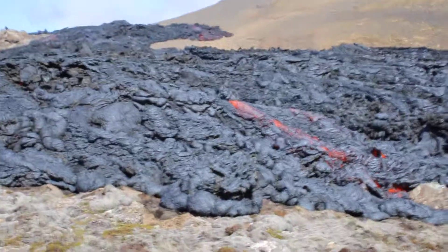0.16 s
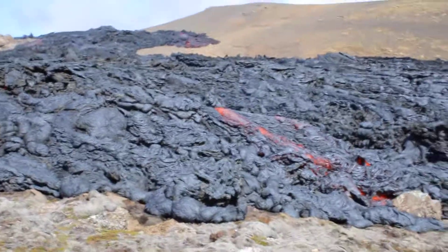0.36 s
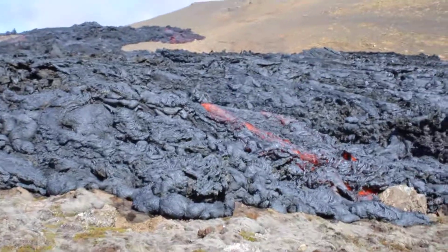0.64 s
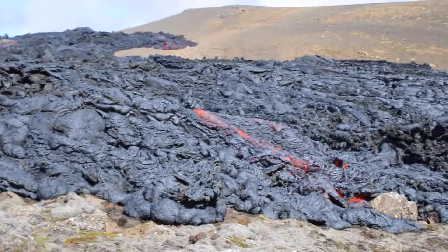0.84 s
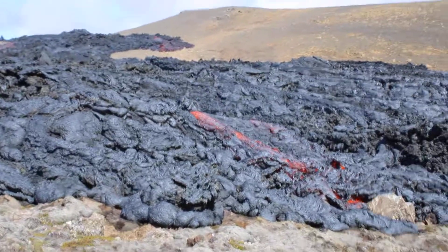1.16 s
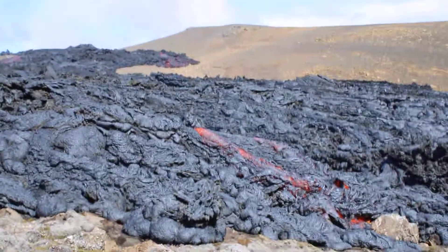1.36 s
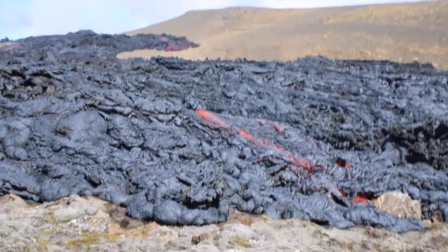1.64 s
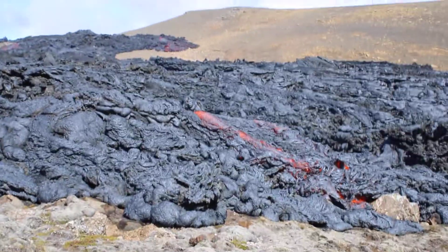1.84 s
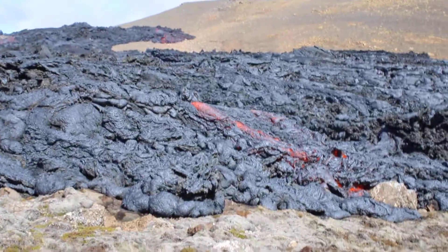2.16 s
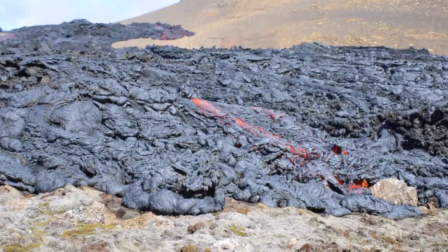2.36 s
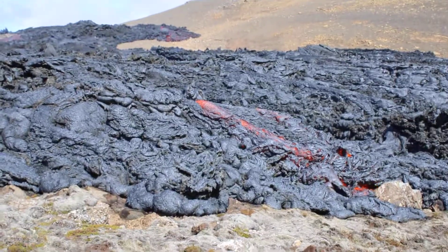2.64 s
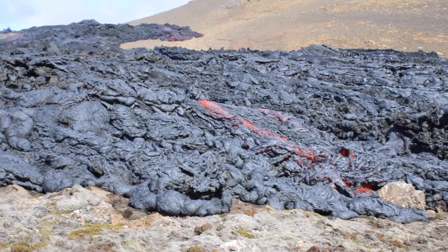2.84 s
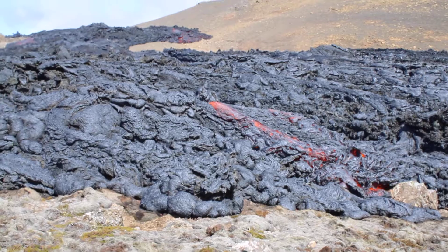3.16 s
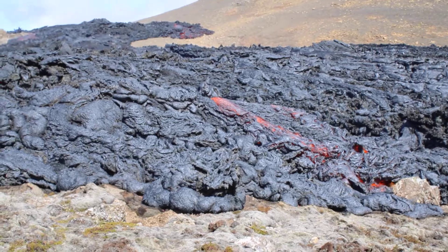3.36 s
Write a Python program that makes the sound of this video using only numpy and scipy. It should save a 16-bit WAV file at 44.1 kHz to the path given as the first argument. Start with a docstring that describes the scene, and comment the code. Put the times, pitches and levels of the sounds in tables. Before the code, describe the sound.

Gusty wind rumbles on a bare microphone beside a lava flow. The rumble swells and sinks throughout, broken by irregular sharp snaps, dull thumps and crackle, with very faint ticks from the cooling rock underneath.

```python
"""Gusty wind on an open slope beside a creeping lava flow, heard through a bare microphone.
From the start, turbulence makes a low rumble with faint hiss and crackle, and the cooling crust ticks.
Almost at once, eddies break on the microphone as sharp snaps and dull thumps, and it briefly chokes.
The hardest snap, after one second, overloads it; four clearer fractures follow in the crust.
The rumble swells and sinks, and the eddies keep coming to the end."""
import sys
import numpy as np
from scipy import signal
from scipy.fft import rfft, irfft
from scipy.io import wavfile

SR = 44100
rng = np.random.default_rng(int(sys.argv[2]) if len(sys.argv) > 2 else 0)


def output_pcm(signal):
    """Save a mono or channel-first signal as 16-bit PCM at the path in sys.argv[1].

    Samples are clipped to [-1, 1] before scaling.
    """
    pcm = np.clip(np.atleast_2d(signal).T, -1, 1) * 32767
    wavfile.write(sys.argv[1], SR, np.round(pcm).astype(np.int16))


N = 154791
TIME = np.arange(N) / SR


def from_db(db):
    """Amplitude ratio of a level in decibels."""
    return 10 ** (np.asarray(db) / 20)

def unit_rms(x):
    """Normalisation to an rms of 1."""
    return x / np.sqrt(np.mean(x ** 2) + 1e-20)

def butter(x, hz, kind, order=2):
    """Butterworth filter."""
    return signal.sosfilt(signal.butter(order, hz, kind, fs=SR, output="sos"), x + 1e-18)

def gains(spectrum, hz):
    """Interpolation of a spectrum on a log-frequency axis."""
    points, db = np.transpose(spectrum)
    return from_db(np.interp(np.log(np.maximum(hz, 1)), np.log(points), db))

def noise(bin_gains, size):
    """Spectral shaping: white noise weighted bin by bin."""
    return irfft(rfft(rng.standard_normal(size)) * bin_gains, size)

def coloured(spectrum):
    """Stationary noise with the given spectrum and an rms of 1."""
    return unit_rms(noise(gains(spectrum, np.fft.rfftfreq(N, 1 / SR)), N))

def flutter(hz):
    """Random modulation: low-passed noise with rounded extremes and a spread of about 1."""
    swing = unit_rms(butter(rng.standard_normal(N + SR), hz, "low")[SR:])
    return 2 * np.tanh(swing / 2)


# Strength of the wind: (time [s], relative level [dB])
WIND_STRENGTH = [(0.01, -18), (0.06, -28), (0.549, -33.5), (0.58, -23.5), (1.219, -26), (1.239, -34),
                 (1.34, -30), (1.442, -20), (1.572, -35.5), (1.95, -22.5), (2.122, -26), (2.209, -21),
                 (2.249, -26), (2.3, -23.5), (2.35, -37), (2.52, -27), (3.14, -34.5), (3.49, -24.5)]
def wind():
    """Gusting: an amplitude envelope that swells and sinks linearly in decibels."""
    return from_db(np.interp(TIME, *np.transpose(WIND_STRENGTH)))


# Spectrum of the turbulent pressure: (frequency [Hz], relative density [dB])
RUMBLE_SPECTRUM = [(20, -15), (38, -2), (70, 0.5), (140, 0), (280, -7.5), (560, -19), (1100, -36.5),
                   (2000, -56.5), (4000, -83.5)]
def rumble(strength, gain_db=3.5, flutter_db=5):
    """Turbulent pressure fluctuation: lumpy low noise whose amplitude follows the wind."""
    lumps = from_db(flutter_db * flutter(hz=29))
    return from_db(gain_db) * strength * unit_rms(coloured(RUMBLE_SPECTRUM) * lumps)


# Spectrum of the wind's hiss: (frequency [Hz], relative density [dB])
HISS_SPECTRUM = [(300, 5.5), (1500, -2.5), (3000, -2), (5000, -8.5), (7800, -9.5), (9500, -27.5),
                 (15000, -48)]
def hiss(strength, level_db=-67, exponent=0.4):
    """Broadband flow noise: its amplitude grows as a weak power of the wind's strength."""
    return from_db(level_db) * unit_rms(strength ** exponent * coloured(HISS_SPECTRUM))


RELEASE_HZ = 348   # high-pass corner that makes pops and snaps swing back
def crackle(strength, pops_per_s=150, gain_db=-20, spread_db=8.5, corner_hz=960):
    """Shot noise: tiny dull pops at random instants, louder in stronger wind."""
    onsets = rng.random(N) < pops_per_s / SR
    sizes = from_db(spread_db * np.minimum(rng.exponential(1, N), 2))
    impulses = onsets * sizes * rng.choice([-1, 1], N)
    pops = butter(butter(impulses, corner_hz, "low"), 2 * corner_hz, "low")
    pops *= SR / (2 * corner_hz)   # makes up the height lost in smoothing
    return from_db(gain_db) * strength * butter(pops, RELEASE_HZ, "high", order=1)


# Spectrum of an eddy before its corner dulls it: (frequency [Hz], relative density [dB])
EDDY_SPECTRUM = [(30, -17), (90, -4), (190, 4), (330, 1), (600, -3), (1200, -2), (2500, -3.5), (4500, -8),
                 (8000, -8), (10500, -32), (15000, -23.5)]
# Eddies at the microphone: (centre time [s], swell and fade scale [s], relative level [dB], corner [Hz])
EDDY_PUFFS = [(0.0169, 0.014, -21.5, 1780), (0.027, 0.0015, -14, 1710), (0.0519, 0.0075, -22.5, 1310),
              (0.0767, 0.0044, -16.5, 1200), (0.1112, 0.0008, -10.5, 3950), (0.1157, 0.0019, -8.5, 1600),
              (0.1754, 0.0018, -17.5, 4530), (0.2505, 0.00047, -26, 1930), (0.281, 0.006, -12.5, 540),
              (0.305, 0.0054, -17, 2380), (0.324, 0.0066, -20.5, 1670), (0.3674, 0.006, -18.5, 2350),
              (0.395, 0.0037, -20.5, 2320), (0.471, 0.0006, -17.5, 1670), (0.5281, 0.00063, -23.5, 1920),
              (0.5528, 0.0019, -15.5, 990), (0.5765, 0.0049, -14.5, 1440), (0.6036, 0.0036, -16.5, 1600),
              (0.6291, 0.0017, -20.5, 1750), (0.666, 0.003, -13, 1710), (0.6741, 0.0025, -10.5, 2100),
              (0.7398, 0.0013, -13, 810.0), (0.7563, 0.00077, -19.5, 1870.0), (0.805, 0.00058, -11, 2700),
              (0.8195, 0.0028, -15, 800), (0.862, 0.0012, -18, 940), (0.8779, 0.0012, -13.5, 1350),
              (0.8950, 0.00074, -14.5, 1850), (0.9401, 0.00033, -3.5, 1300), (0.947, 0.0016, -14.5, 1920),
              (0.9560, 0.0027, -12.5, 1900), (0.967, 0.0045, -15.5, 960), (1.005, 0.0022, -23.5, 1050),
              (1.0617, 0.0089, -8, 770), (1.098, 0.016, -17, 1300.0), (1.117, 0.00074, -12.5, 1640),
              (1.132, 0.0068, -22, 1063), (1.1422, 0.0014, -10.5, 1000), (1.1742, 0.0042, -13, 1250),
              (1.236, 0.00098, -14, 690), (1.2512, 0.006, -2, 600), (1.2937, 0.0081, -6.5, 580),
              (1.2966, 0.012, -27, 2400.0), (1.328, 0.0046, -20, 1440), (1.3833, 0.0016, -18.5, 2340),
              (1.4106, 0.0013, -15, 1700), (1.4387, 0.0015, -12, 864), (1.4621, 0.004, -20.5, 1640),
              (1.5194, 0.0073, -21, 1000), (1.5981, 0.0051, -20, 1110), (1.6412, 0.0022, -19, 756),
              (1.6908, 0.0073, -10.5, 1040), (1.749, 0.013, -17.5, 1480), (1.7621, 0.0006, -6.5, 1400),
              (1.787, 0.0055, -17.5, 990), (1.828, 0.012, -15.5, 1180), (1.860, 0.0073, -19.5, 1630),
              (1.8917, 0.00066, -11, 510), (1.9124, 0.0045, -18, 1370), (1.929, 0.0069, -21, 2070),
              (1.971, 0.0043, -15, 350.0), (2.0356, 0.00077, -26, 1230), (2.0567, 0.0012, -13, 2140),
              (2.1941, 0.014, -14, 890), (2.2115, 0.00095, -1, 745), (2.2433, 0.0022, -9.5, 706),
              (2.2842, 0.0021, -9.5, 1110), (2.3928, 0.0042, -17, 675), (2.4903, 0.018, -12, 950),
              (2.5106, 0.0036, -10, 1310), (2.534, 0.0019, -12.5, 1150), (2.5942, 0.026, -10, 680),
              (2.627, 0.015, -8.5, 1480), (2.708, 0.011, -19.5, 1100), (2.7333, 0.013, -6.5, 1800),
              (2.7845, 0.0078, -15.5, 1650), (2.868, 0.0063, -20, 956), (2.901, 0.0046, -22, 1360),
              (2.9315, 0.0086, -21.5, 560), (3.017, 0.0014, -13.5, 436), (3.0802, 0.014, -19, 1130),
              (3.1624, 0.0088, -17.5, 1100), (3.2316, 0.0086, -15.5, 1480), (3.2782, 0.0031, -11, 2060),
              (3.2808, 0.01, -15.5, 1300.0), (3.302, 0.0027, -20.5, 1120), (3.33, 0.014, -21.5, 910),
              (3.397, 0.01, -21.5, 1100), (3.4399, 0.0061, -17.5, 1170), (3.4583, 0.00086, -6.5, 1310),
              (3.4674, 0.0019, -12.5, 1290), (3.503, 0.0075, -17.5, 1420)]
def eddies(gain_db=-1.5, rolloff=3.547, fade_ratio=1.1, abruptness=1.385):
    """Turbulent puffs: each has a dull body and shorter, spurting treble; faster eddies reach higher."""
    size = 8192
    out = np.zeros(N + 2 * size)
    offsets = np.arange(size) - size // 2
    hz = np.fft.rfftfreq(size, 1 / SR)
    spurts = flutter(hz=210)
    bright, sharp = (1 - 1 / (1 + (hz / edge_hz) ** 8) for edge_hz in (946, 3530))
    # Body, treble and top: (share of power, flutter depth [dB], duration ratio)
    bands = ((1 - bright, 2.5, 1), (bright * (1 - sharp), 9.5, 0.79), (bright * sharp, 12, 0.79))
    base_power = gains(EDDY_SPECTRUM, hz) ** 2
    age = offsets / SR * fade_ratio ** (-np.sign(offsets) / 2)   # the fade outlasts the swell
    for centre_s, scale_s, db, corner_hz in EDDY_PUFFS:
        at = int(centre_s * SR) + offsets
        power = base_power / (1 + (hz / corner_hz) ** 2) ** rolloff
        for share, depth_db, duration_ratio in bands:
            envelope = np.exp(-.5 * np.abs(age / (scale_s * duration_ratio)) ** abruptness)
            band_noise = noise(np.sqrt(power * share), size)
            puff = unit_rms(band_noise * envelope * from_db(depth_db * spurts[at % N]))
            band_rms = np.sqrt(np.mean(envelope ** 2) * np.sum(power * share) / np.sum(power))
            out[at + size] += from_db(db + gain_db) * band_rms * puff
    return out[size:size + N]


# Pressure spikes before the high-pass: (time [s], peak level [dB], half-width [s])
PRESSURE_SPIKES = [(.0148, -13, 0.000064), (.1142, -9.5, 0.000075), (.2500, -16, 0.00013),
                   (.4698, -28.5, 0.00015), (.5250, -15, 0.0002), (.8098, -8, 0.00015),
                   (.8145, -14, 0.00013), (.9545, -6, 0.00014), (1.0040, 7, 0.00046),
                   (1.0655, -7.5, 0.00013), (1.2970, -15, 0.00008), (1.4385, -3.5, 0.00025),
                   (1.6901, -20.5, 0.000084), (1.7450, -22.5, 0.00012), (1.8580, -15, 0.00013),
                   (1.8685, -12, 0.00016), (1.9306, 0, .00012), (2.1945, -13.5, 0.00017),
                   (2.4885, -12, 0.00019), (2.7256, -6, 0.000059), (2.7605, -17, 0.000094),
                   (3.0825, 0, 0.00025), (3.2762, -3, 0.00019), (3.4580, -5, 0.00018)]
def snaps():
    """Pressure transients: steep Lorentzian pulses, high-passed so that they swing back at once."""
    spikes = sum(from_db(db) / (1 + ((TIME - s) / width) ** 2) for s, db, width in PRESSURE_SPIKES)
    return butter(spikes, RELEASE_HZ, "high", order=1)


# Spectrum of a tick in the crust: (frequency [Hz], relative density [dB])
CRUST_SPECTRUM = [(800, -19.5), (2500, -1), (5500, 1), (8500, 1.5), (11000, -18), (15000, -18)]
# The clearer fractures: (time [s], level [dB])
CRUST_FRACTURES = [(1.338, -49), (1.445, -58), (2.239, -55), (2.547, -62)]
def crust(ticks_per_s=22, tick_db=-67, decay_s=0.0041):
    """Acoustic emission: each tiny fracture in the cooling rock is an exponentially decaying fizz."""
    impulses = (rng.random(N) < ticks_per_s / SR) * from_db(tick_db)
    for s, db in CRUST_FRACTURES:
        impulses[int(s * SR)] += from_db(db)
    envelope = signal.lfilter([1], [1, -np.exp(-1 / (decay_s * SR))], impulses + 1e-18)
    return envelope * coloured(CRUST_SPECTRUM)


# Moments when the microphone chokes: (start time [s], duration [s])
MIC_CHOKES = [(0.062, 0.0098), (0.124, 0.0064), (0.205, 0.0048), (0.22, 0.019), (1.109, 0.0067),
              (1.356, .020), (1.396, 0.013), (2.762, 0.0061)]
def choking(depth_db=-38, edge_s=0.0001):
    """Blocking: the microphone's sensitivity drops for milliseconds at each listed push of wind."""
    shut = sum(np.tanh((TIME - start) / edge_s) - np.tanh((TIME - start - duration) / edge_s)
               for start, duration in MIC_CHOKES) / 2
    return 1 - shut * (1 - from_db(depth_db))


def overload(x, limit=1.2):
    """Saturation: peaks are rounded off near the microphone's limit."""
    return x / (1 + (x / limit) ** 6) ** (1 / 6)


def scene():
    """Superposition: all sources add at one microphone, with no echo, scaled by its sensitivity."""
    strength = wind()
    air = rumble(strength) + hiss(strength) + crackle(strength) + eddies() + snaps() + crust()
    return (air * choking())[None]


def record(dry, low_hz=26, stopband_hz=15800, fade_s=0.004):
    """Band limiting and saturation: deep bass is lost, peaks round off, the ends fade, the top is cut."""
    to_nearest_end = np.minimum(TIME, TIME[::-1])
    fade = np.sin(np.pi / 2 * np.minimum(to_nearest_end / fade_s, 1)) ** 2
    rounded = overload(butter(dry, low_hz, "high"))
    return signal.sosfilt(signal.cheby2(12, 70, stopband_hz, fs=SR, output="sos"), rounded * fade)


dry = scene()
out = record(dry)
output_pcm(out)
```